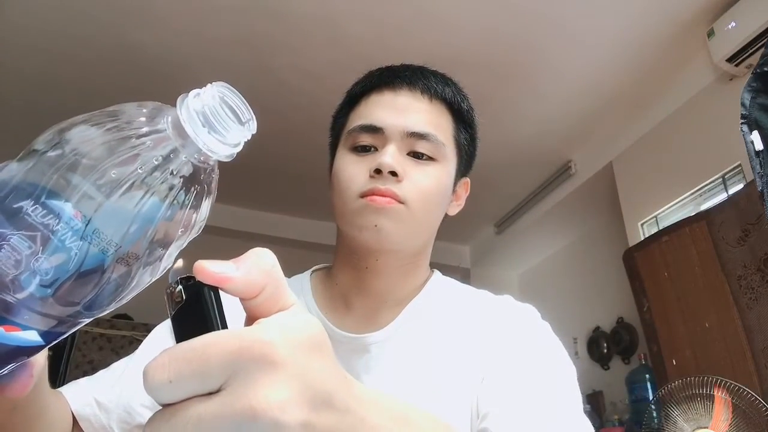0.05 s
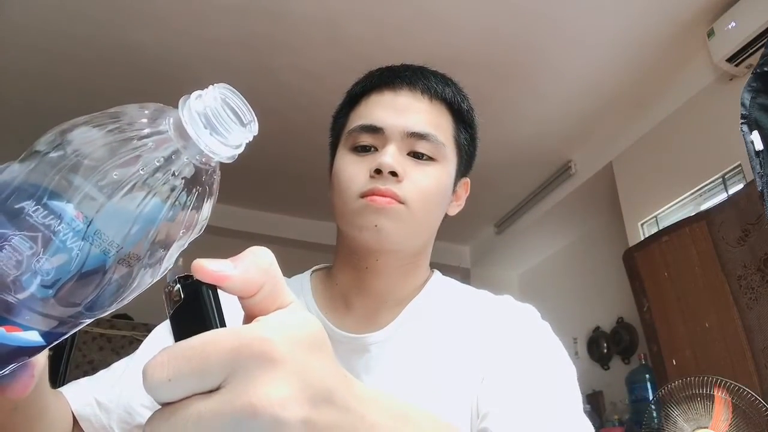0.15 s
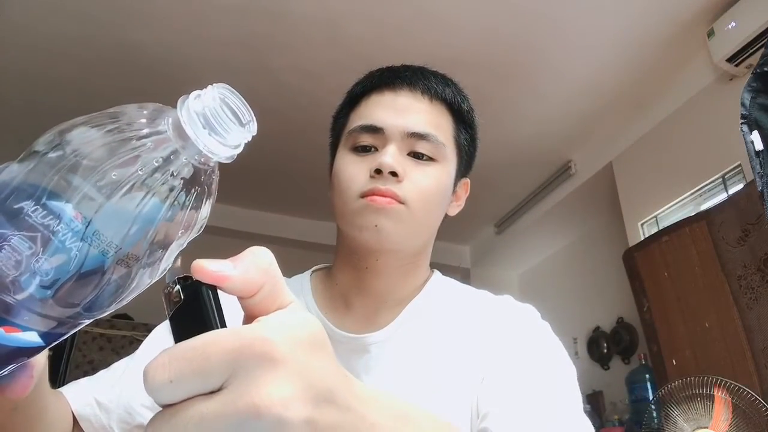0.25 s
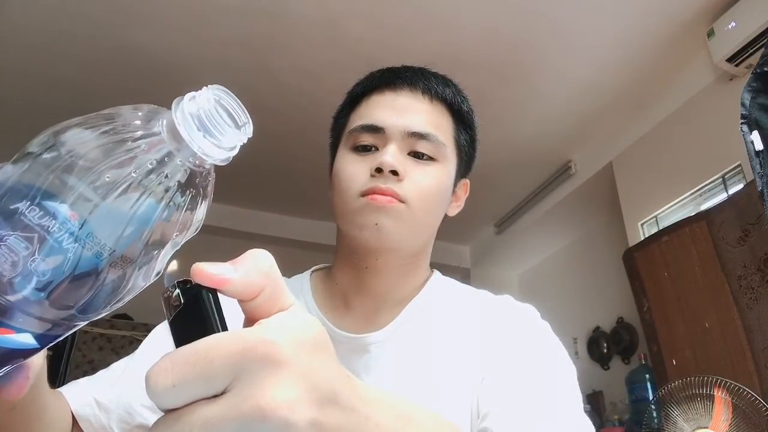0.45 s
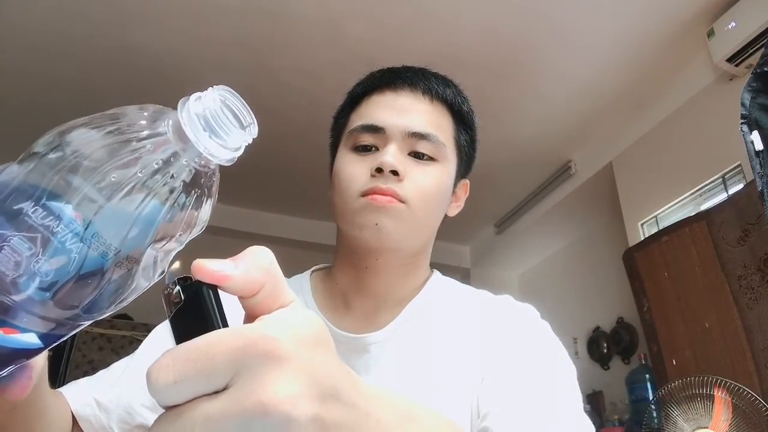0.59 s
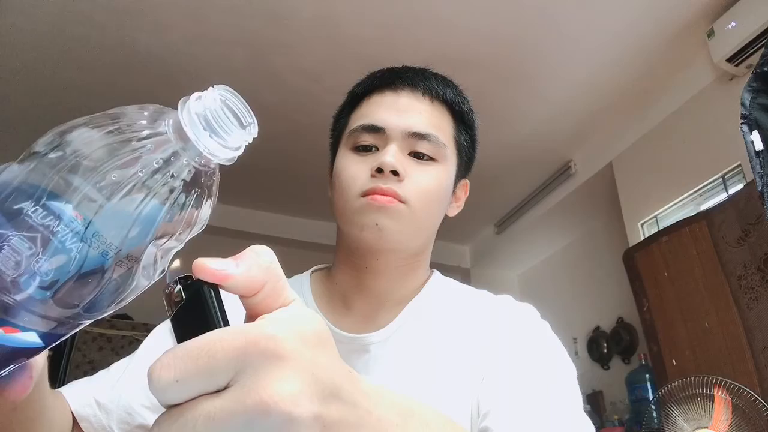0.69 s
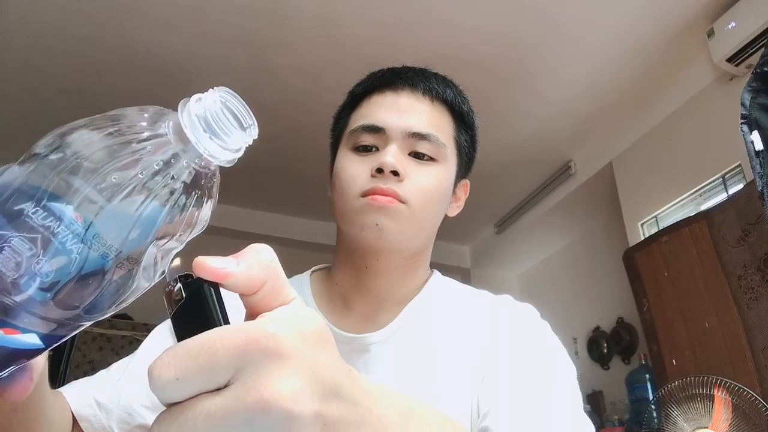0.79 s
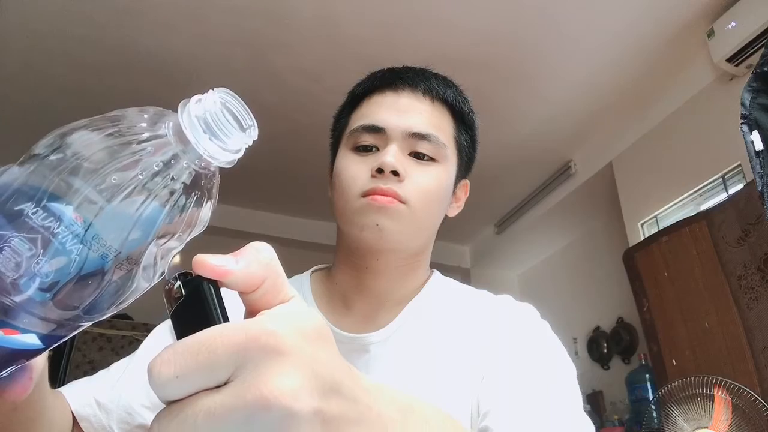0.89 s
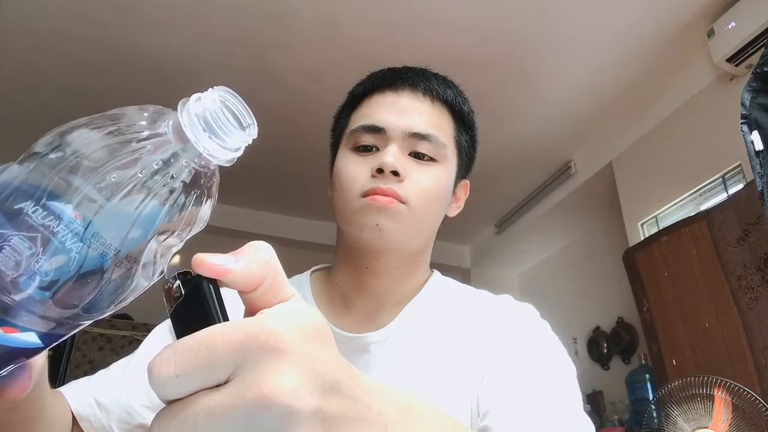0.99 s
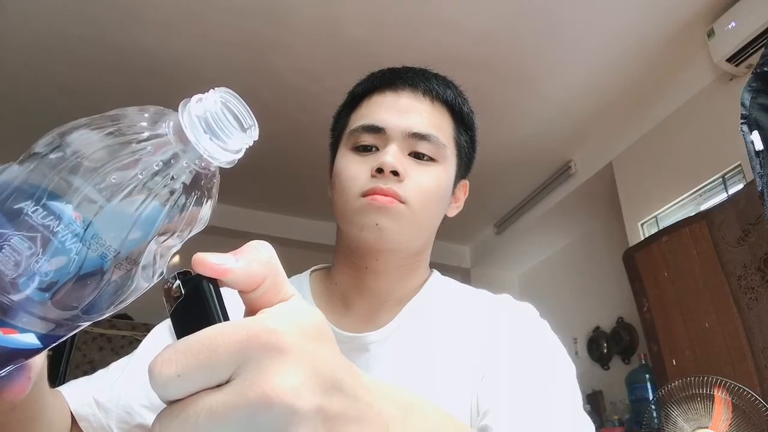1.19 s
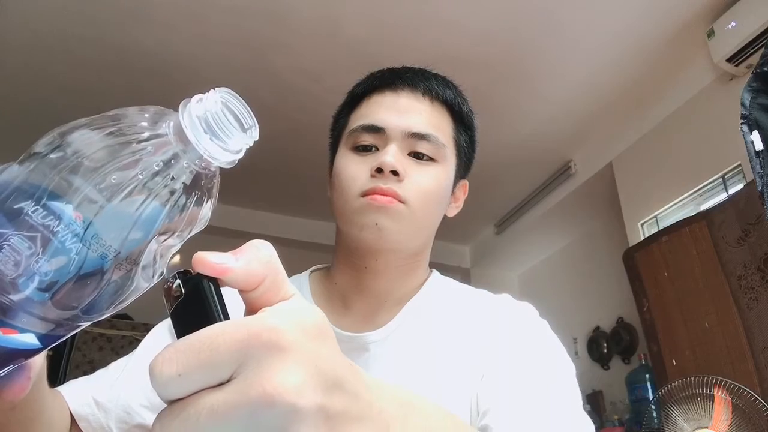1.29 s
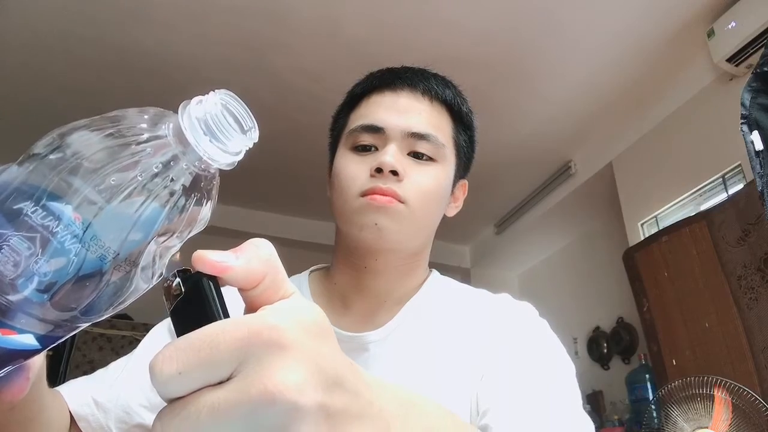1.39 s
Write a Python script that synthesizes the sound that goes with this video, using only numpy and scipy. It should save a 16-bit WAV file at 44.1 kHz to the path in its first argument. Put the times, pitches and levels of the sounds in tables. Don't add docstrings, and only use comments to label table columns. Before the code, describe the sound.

Close to a phone microphone, three quick lighter clicks grow from soft to sharp and scratchy, with hollow plastic knock; after a pause one last click. A bare room rings briefly over low fan hum and rumble.

```python
import sys
import numpy as np
from scipy import signal
from scipy.fft import rfft, irfft
from scipy.io import wavfile

SR = 44100
rng = np.random.default_rng(int(sys.argv[2]) if len(sys.argv) > 2 else 0)


def gain_from_db(level_db):
    decades = np.asarray(level_db, float) / 20
    return 10 ** decades


def unload_wav(signal):
    wavfile.write(
        sys.argv[1],
        SR,
        np.round(np.clip(np.atleast_2d(signal).T, -1, 1) * 32767).astype(np.int16),
    )


N = 63945

# start_s, body_db, grit_db, grit_pitch_hz, room_db
SNAPS = [
    (0.2061, -7.5, -22, 4500, -12.5),
    (0.2646, 1, -14, 6200, -13),
    (0.3765, -3, -3, 6400, -9),
    (0.9265, -7, -7.5, 6206, -8.5),
]
# broad_grit_db, grit_top_hz, bottle_air_db, room_tilt_db_per_octave
SNAP_EDGES = [
    (-3, 7700, -49, -1),
    (4, 12000, -20, -1),
    (14, 12000, -22, -0.37),
    (5, 16000, -54, 0.03),
]
# pitch_hz, level_db, t60_s
PRESS_MODES = [(470, -28, .03), (696, -19, 0.037), (930, -17, 0.029), (1307, -3.5, 0.026),
               (1670, -4, 0.035), (1894, -11.5, 0.048), (2200, -17.5, .015), (2650, -10.5, 0.019),
               (3310, -12, 0.018), (4010, -16.5, 0.022), (4800, -28, 0.044), (6237, -32.5, 0.0061),
               (6500, -27.5, .012), (8300, -39.5, 0.019)]
# pitch_hz, level_db, t60_s
GIVE_MODES = [(575.5, -3.5, 0.02), (842.4, 0.5, 0.02), (1055, -11, 0.036), (1300, -9, 0.06),
              (1750, -16.5, .02), (2446.4, -5, 0.02), (2990, -22.5, 0.053), (3576, -12.5, 0.015),
              (3890, -17, 0.025), (5250, -23.5, 0.022), (6400, -18.5, .012)]
# pitch_hz, level_db, t60_s
STRIKE_MODES = [(582, -10.5, 0.062), (800, 1.5, 0.019), (1143, 2.5, 0.012), (1357, -7, 0.048),
                (1700, -10.5, 0.032), (2355, -11.5, 0.029), (2660, -14, 0.02), (3036, -12, .035),
                (4260, -12, 0.026), (6200, -27, 0.037), (6700, -41, 0.035)]
# pitch_hz, level_db, t60_s
RELEASE_MODES = [(366, -15, 0.077), (689, 4.5, 0.024), (874, -4, 0.071), (976, 1, 0.029),
                 (1323, -15.5, 0.14), (1455, -6.5, 0.036), (1904, 0, 0.039), (2414, -16, 0.052),
                 (2720, -12, 0.0335), (3328, -9, 0.038), (4100, -14.5, 0.039), (4370, -17.5, 0.0646),
                 (6556, -31, 0.0193)]
# delay_s, level_db
WALL_ECHOES = [(.006, -11), (.039, -23)]
# frequency_hz, t60_s
ROOM_T60 = [(200, 0.18), (600, 0.57), (1400, 0.45), (3700, .5), (7000, 0.38), (11000, 0.39), (15000, -0.05)]
# frequency_hz, level_db
ROOM_COLOUR = [(200, -8), (400, -7), (800, -2), (2000, -0.5), (4000, 4), (6500, -0.5), (10000, 0),
               (14000, 3)]
# pitch_hz, rms_db, wander_db
MOTOR_LINES = [(98.9, -51.5, 4.5), (143.5, -46.5, 1.5), (187, -66.5, 5), (650, -66, 3.66),
               (1163, -70.5, -1)]
# frequency_hz, density_db_per_hz
RUMBLE_SPECTRUM = [(22, -14), (35, -10), (57, 1), (75, -8.5), (110, -11), (130, -8), (170, -20),
                   (220, -22.5)]
# frequency_hz, density_db_per_hz
AIR_SPECTRUM = [(220, -5), (400, -6.5), (520, -8), (900, -10.5), (1300, -11.5), (1700, -21), (2500, -26.5),
                (8000, -35.5), (16400, -36)]

BODY_LAG_S, CONTACT_HZ, BODY_FLOOR_HZ = 0.0004, 5350, 300
GRIT_S, GRIT_TAIL_S, GRIT_TAIL_DB = 0.0005, 0.006, -5.5
GRIT_WIDTH_HZ, GRIT_BROAD_DB = 1500, -5.5
BOTTLE_HZ, BOTTLE_T60_S, BOTTLE_RISE_S = 125, 0.2, 0.0073
TICK_S, TICK_DB = 0.1440, -40
ECHO_HZ = 1490
EARLY_DB, EARLY_T60_S, ROOM_BUILD_S = 15.5, 0.085, 0.018
SCATTER_HZ = 300
RUMBLE_DB, GUST_DB, AIR_DB = -43, 1.2, -56
CEILING, FADE_S, CUTOFF_HZ = 0.92, 0.012, 16700


def lighter():
    out = np.zeros(N + SR)
    room = room_response()
    mode_sets = (PRESS_MODES, GIVE_MODES, STRIKE_MODES, RELEASE_MODES)
    for event, edge, modes in zip(SNAPS, SNAP_EDGES, mode_sets):
        start_s, body_db, grit_db, grit_hz, room_db = event
        broad_db, top_hz, air_db, tilt_db = edge
        snap = gain_from_db(body_db) * body(modes)
        snap = snap + gain_from_db(grit_db) * grit(grit_hz, broad_db, top_hz)
        start = int(start_s * SR)
        add_at(out, start, snap)
        add_at(out, start, bottle_air(air_db))
        add_wall_echoes(out, start, snap)
        add_at(out, start, gain_from_db(room_db) * reverberate(snap, room, tilt_db))
    add_at(out, int(TICK_S * SR), gain_from_db(TICK_DB) * np.array([-1, 0.5]))
    return out[:N]


def body(modes):
    contact = np.zeros(SR // 4)
    contact[int(BODY_LAG_S * SR)] = 1
    rings = np.zeros(len(contact))
    for k, (hz, level_db, t60_s) in enumerate(modes):
        sign = (-1) ** k
        rings += sign * gain_from_db(level_db) * ring(contact, hz, t60_s)
    rounded = lowpass(rings, CONTACT_HZ)
    floor = signal.butter(4, BODY_FLOOR_HZ, "high", fs=SR, output="sos")
    return signal.sosfilt(floor, rounded)


def grit(hz, broad_db, top_hz):
    t = np.arange(SR // 4) / SR
    burst = np.exp(-np.minimum((t / GRIT_S - 1) ** 2, 50))
    tail = gain_from_db(GRIT_TAIL_DB) * np.exp(-t / GRIT_TAIL_S)
    clicks = rng.standard_normal(len(t)) * (burst + tail)
    r = np.exp(-np.pi * GRIT_WIDTH_HZ / SR)
    w = 2 * np.pi * hz / SR
    hood = signal.lfilter([1, 0, -1], [1, -2 * r * np.cos(w), r * r], clicks)
    broad = np.diff(clicks, prepend=0)
    mix = hood / np.abs(hood).max()
    mix = mix + gain_from_db(GRIT_BROAD_DB + broad_db) * broad / np.abs(broad).max()
    return lowpass(lowpass(mix, top_hz), top_hz)


def bottle_air(level_db):
    push = np.zeros(SR // 2)
    push[0] = gain_from_db(level_db)
    swell = 1 - np.exp(-np.arange(SR // 2) / SR / BOTTLE_RISE_S)
    return ring(push, BOTTLE_HZ, BOTTLE_T60_S) * swell


def add_wall_echoes(out, start, snap):
    dull = lowpass(lowpass(snap, ECHO_HZ), ECHO_HZ)
    for delay_s, level_db in WALL_ECHOES:
        add_at(out, start + int(delay_s * SR), gain_from_db(level_db) * dull)


def room_response():
    t = np.arange(SR // 2 + SR // 4) / SR
    out = np.zeros(len(t))
    edges = 180 * 2 ** np.arange(0, 6.6, 0.5)
    white = rng.standard_normal((2, len(t)))
    for k, (low, high) in enumerate(zip(edges, edges[1:])):
        hz = np.sqrt(low * high)
        band_filter = signal.butter(2, [low, high], "band", fs=SR, output="sos")
        band = signal.sosfilt(band_filter, white[k % 2])
        out += band * gain_from_db(at_hz(ROOM_COLOUR, hz) - 60 * t / at_hz(ROOM_T60, hz))
    early = 1 + gain_from_db(EARLY_DB - 60 * t / EARLY_T60_S)
    build = 1 - np.exp(-t / ROOM_BUILD_S)
    return out * early * build / np.sqrt(SR / 20)


def reverberate(snap, room, tilt_db):
    size = SR + SR // 4
    hz = np.arange(size // 2 + 1) * SR / size + 1
    total = np.cumsum(np.abs(rfft(snap, size)) ** 2)
    half = 1 + SCATTER_HZ / 2000
    power = np.interp(hz * half, hz, total) - np.interp(hz / half, hz, total)
    power = power / (hz * (half - 1 / half)) * SR / size
    colour = np.sqrt(np.abs(power)) * gain_from_db(tilt_db * np.log2(hz / 1000))
    return irfft(colour * rfft(room, size), size)[:len(room)]


def fan():
    t = np.arange(N) / SR
    lines = np.zeros(N)
    for hz, rms_db, wander_db in MOTOR_LINES:
        level = np.sqrt(2) * gain_from_db(rms_db + wander_db * drift(4))
        phase = rng.uniform(0, 2 * np.pi) + 0.54 * drift(1)
        lines += level * np.sin(2 * np.pi * hz * t + phase)
    return lines


def moving_air():
    rumble = gain_from_db(RUMBLE_DB + GUST_DB * drift(2.5)) * coloured(RUMBLE_SPECTRUM)
    return rumble + gain_from_db(AIR_DB) * coloured(AIR_SPECTRUM)


def add_at(out, start, sound):
    out[start:start + len(sound)] += sound


def ring(clicks, hz, t60_s):
    r = gain_from_db(-60 / (t60_s * SR))
    w = 2 * np.pi * hz / SR
    return signal.lfilter([0, np.sin(w)], [1, -2 * r * np.cos(w), r * r], clicks + 1e-18)


def lowpass(x, hz):
    return signal.sosfilt(signal.butter(2, min(hz, 0.45 * SR), fs=SR, output="sos"), x)


def rms_one(x):
    return x / np.sqrt(np.mean(x ** 2) + 1e-20)


def at_hz(points, hz):
    table = np.array(points)
    return np.interp(np.log(hz), np.log(table[:, 0]), table[:, 1])


def drift(rate_hz):
    r = np.exp(-80 * np.pi * rate_hz / SR)
    noise = rng.standard_normal(N // 40 + 2002)
    slow = signal.lfilter([1], [1, -2 * r, r * r], noise)[2000:]
    return np.interp(np.arange(N) / 40, np.arange(len(slow)), rms_one(slow - slow.mean()))


def coloured(spectrum):
    hz = np.arange(N // 2 + 1) * SR / N + 1
    inside = (hz > spectrum[0][0]) & (hz < spectrum[-1][0])
    white = rfft(rng.standard_normal(N))
    return rms_one(irfft(white * gain_from_db(at_hz(spectrum, hz)) * inside, N))


def scene():
    return (lighter() + fan() + moving_air())[None, :]


def low_pass(x):
    return signal.sosfilt(signal.butter(12, 16540, fs=SR, output="sos"), x)


def record(dry):
    held = dry / (1 + (dry / CEILING) ** 8) ** (1 / 8)
    faded = held * np.minimum(np.arange(N)[::-1] / SR / FADE_S, 1)
    top_cut = signal.cheby2(10, 60, CUTOFF_HZ, fs=SR, output="sos")
    finished = signal.sosfilt(top_cut, faded)
    return low_pass(finished)


dry = scene()
out = record(dry)
unload_wav(out)
```